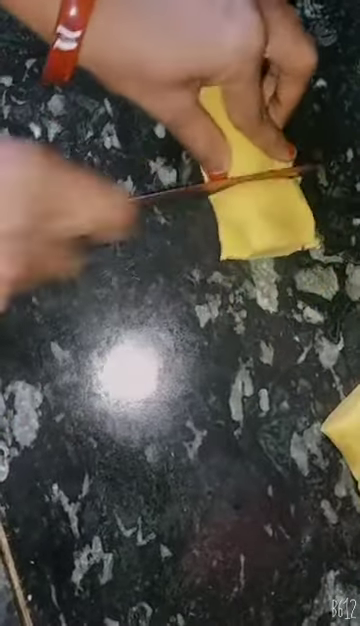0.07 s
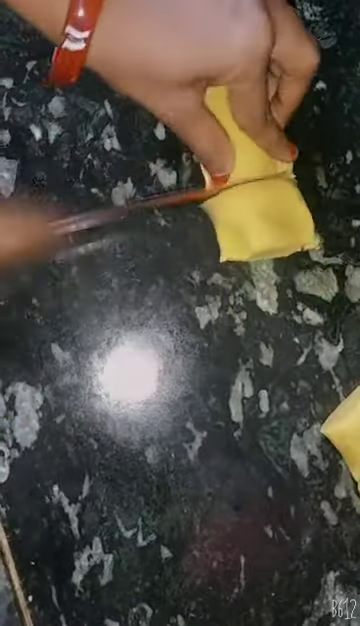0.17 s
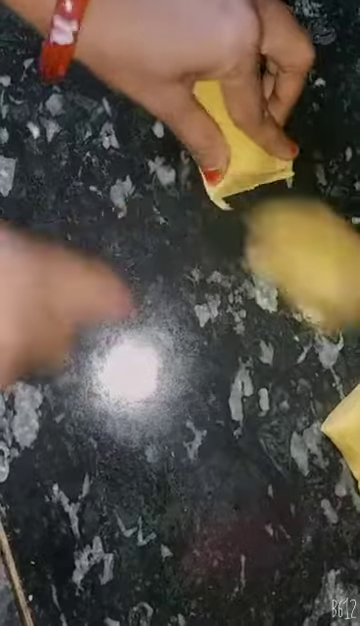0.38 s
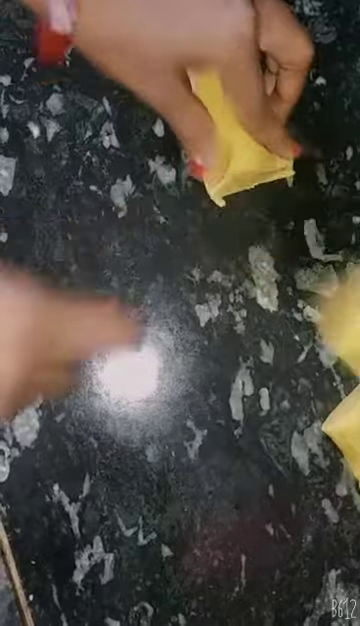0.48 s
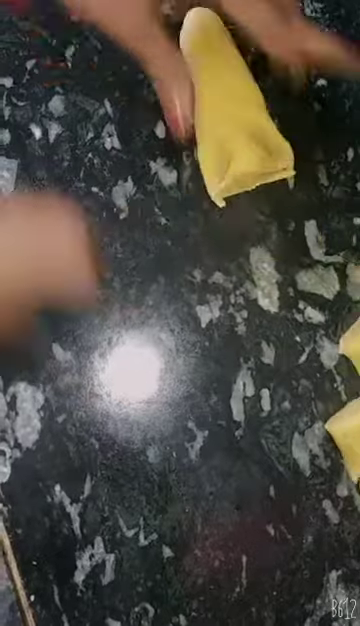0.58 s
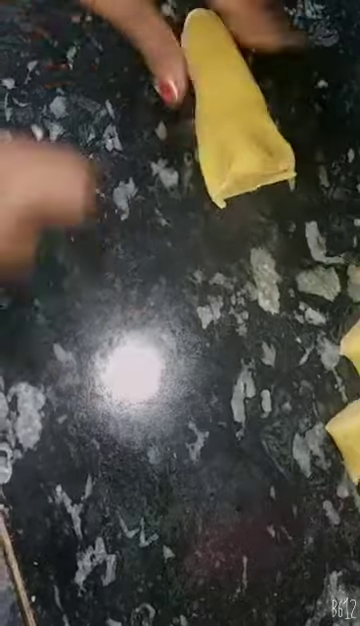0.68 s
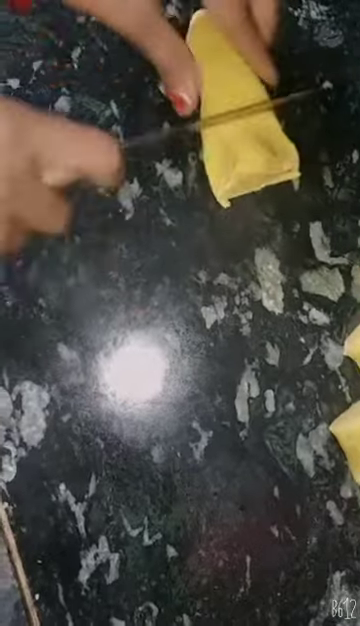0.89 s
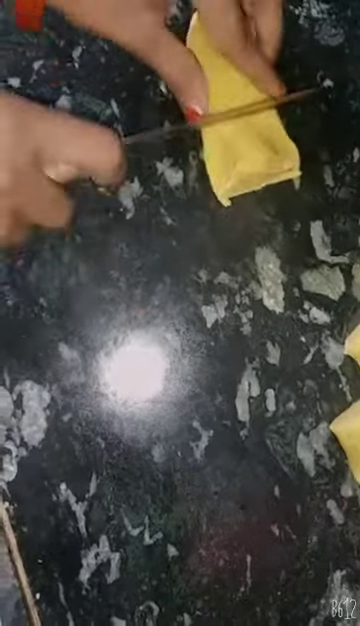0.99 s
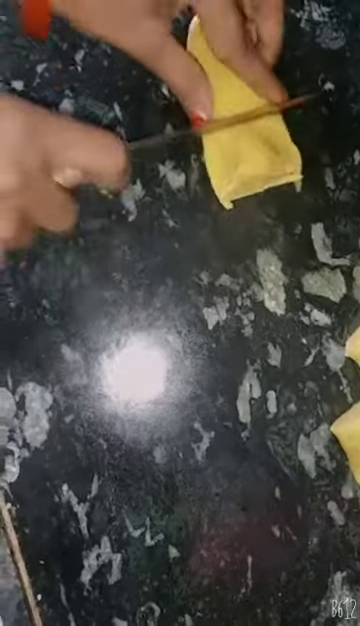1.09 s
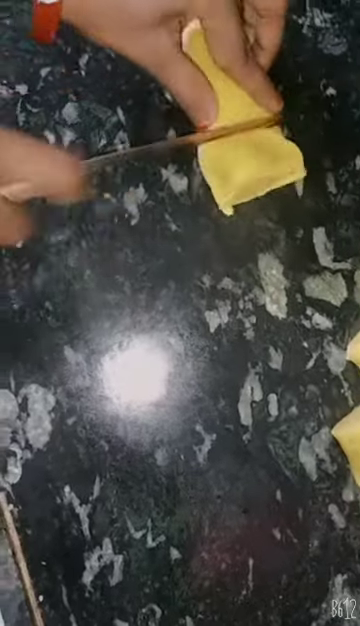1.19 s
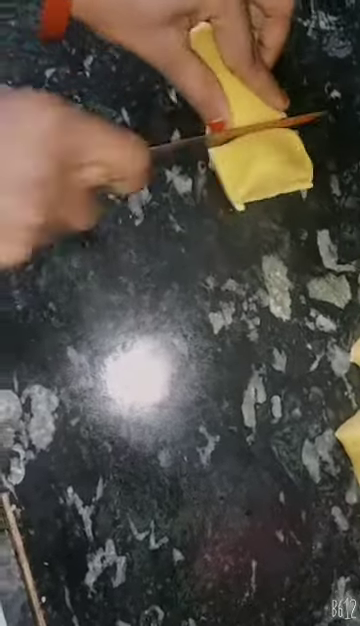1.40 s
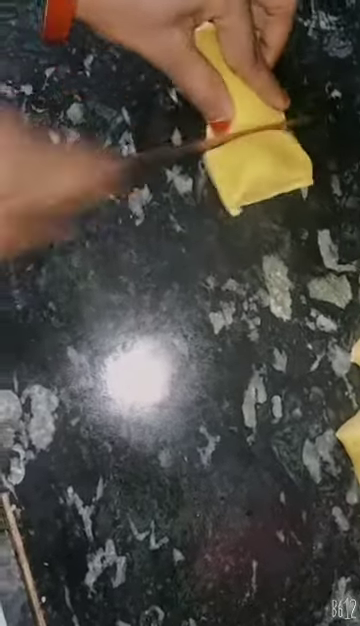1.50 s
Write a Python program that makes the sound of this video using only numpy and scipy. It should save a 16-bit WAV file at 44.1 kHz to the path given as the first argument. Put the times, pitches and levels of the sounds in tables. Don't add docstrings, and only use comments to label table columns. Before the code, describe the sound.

Close up, a knife cutting stiff dough gives sharp ticks and one brief metallic skid on stone, then near quiet over a low hum, a crisp second click and light sawing, with a short bright room tail.

```python
import sys
import numpy as np
from scipy import signal
from scipy.fft import rfft, irfft
from scipy.io import wavfile
from scipy.ndimage import map_coordinates

SR = 44100
rng = np.random.default_rng(int(sys.argv[2]) if len(sys.argv) > 2 else 0)


def dump_mix(stems):
    frames = np.atleast_2d(stems).T
    limited = np.clip(frames, -1, 1)
    pcm = np.round(limited * 32767).astype(np.int16)
    wavfile.write(sys.argv[1], SR, pcm)


def invert_db(x):
    u = np.asarray(x, float) / 20
    return 10 ** u


N = 66150
T = np.arange(N) / SR

# f/Hz, level/dB
HUM_COLOUR = [(60, -44), (110, -25.5), (200, -7), (300, -9), (800, -9.5), (2600, -23.5), (7000, -25.5),
              (12000, -22.5)]
# f/Hz, width/Hz, level/dB
HUM_HUMPS = [(330, 120, 0.5), (795.5, 120, -6)]
HUM_DB, HUMPS_DB = -62, -6.5

# start t/s, hardest t/s, lift
# t/s, level/dB, brightness f/Hz
SAWING = [(-.03, 0.004, 0.038, -46, 9240), (-.02, 0.011, 0.02, -55, 4080), (0.101, 0.13, 0.48, -57, 10700),
          (.96, 1.006, 1.075, -67, 9950), (1.108, 1.154, 1.3, -61, 10900), (1.177, 1.189, 1.148, -40, 8700),
          (1.192, 1.233, 1.35, -55.5, 8700), (1.269, 1.289, 1.287, -36.5, 8700),
          (1.32, 1.336, 0.87, -66, 8700), (1.401, 1.456, 1.63, -53, 11400),
          (1.422, 1.484, 1.53, -48.5, 8150)]
RISE_DB, FADE_DB = 15, 9
STROKE_Q, STROKE_BODY_DB = 2.1, -11
GRIT_PER_S, GRIT_SCATTER_DB = 16000, 1.3
CHATTER_PER_S, CHATTER_DB = 280, 2.4

# t/s, level/dB, ring time/s
EDGE_TICKS = [(.0098, -38, .002), (.0188, -33, .004), (.1878, -23, .003), (.2028, -20, .004),
              (.2085, -16, .005), (1.1810, -33, .003), (1.1827, -9, .0035), (1.1853, -20, .004),
              (1.1965, -26, .004), (1.467, -36, .003), (1.447, -40, .003), (1.458, -39, .002),
              (1.482, -40, .003)]
# f/Hz, level/dB
TICK_TONES = [(2100, -23), (3500, -14), (4700, -21), (5900, -19), (7800, -2), (9300, -8), (11100, -1),
              (12500, -10), (13600, -13)]
# f/Hz, level/dB
STEEL_ON_STONE = [(600, -18.5), (1500, -29.5), (2400, -26), (3800, -21.5), (5200, -15), (6800, -15),
                  (11000, -8), (14000, -9)]
TICK_CRACK_DB = -4

# t/s, level/dB
SKID_PRESSURE = [
    (.165, -52),
    (.186, -41),
    (.189, -33),
    (.198, -34),
    (.204, -25),
    (.222, -22),
    (.231, -23),
    (.2455, -20),
    (.249, -45),
]
# f/Hz, width/Hz, level/dB
BLADE_TONES = [(3820, 190, -20.5), (4900, 130, -22), (8000, 328.7, -13), (8700, 130, -18),
               (9630, 200, -10.5), (10800, 250, -3.5), (12040, 140, -5.5), (11900, 250, -24),
               (13000, 750, -14)]
BLADE_DB = -1.5

# t/s, f/Hz, level/dB, time to fall 60 dB/s
COUNTER_KNOCKS = [
    (.2375, 1300, -43, .012),
    (.2375, 550, -50, .02),
    (.205, 620, -56, .05),
    (.247, 2110, -45, .07),
    (.757, 270, -49, .07),
    (.2, 130, -66, .2),
    (1.183, 60, -69, .08),
]

# f/Hz, start t/s, end t/s, level/dB
SQUEAL_TONES = [
    (11630, .214, .230, -26),
    (8000, .217, .222, -24),
    (10560, .2345, .2478, -14.5),
    (9590, .236, .247, -25),
    (5000, .239, .244, -30),
]
SQUEAL_RAMP_S = .003

# f/Hz, time to fall 60 dB/s
ROOM_DECAY = [(1000, .42), (4500, .4), (8000, .32), (10500, .29), (13000, .21)]
ROOM_DB, ROOM_GAP_S = -2.5, 0.001446
TICK_ROOM_DB, SQUEAL_ROOM_DB, KNOCK_ROOM_DB = -5, -12, -8

THIN_HZ, BODY_DB = 1335, -16
NOTCH_HZ, NOTCH_WIDTH_HZ, NOTCH_SHARE = 2650, 450, .97
TOP_HZ = 13950


def unit(x):
    return x / np.sqrt(np.mean(x ** 2))


def band(x, hz, width):
    return signal.lfilter(*signal.iirpeak(min(hz, .45 * SR), hz / width, SR), x)


def colour(x, table):
    f = np.arange(N // 2 + 1) * SR / N + 1
    hz, db = np.array(table).T
    return irfft(rfft(x) * invert_db(np.interp(np.log(f), np.log(hz), db)), N)


def walk(rate):
    return unit(map_coordinates(rng.standard_normal(N), [T * rate], order=3))


def ring(s, hz, t60):
    u = np.maximum(T - s, 0)
    decay = np.exp(-np.log(1000) * u / t60)
    swell = 1 - np.exp(-u * hz * 0.98)
    return np.sin(2 * np.pi * hz * u) * decay * swell


def kitchen():
    hum = unit(colour(rng.standard_normal(N), HUM_COLOUR))
    humps = 0
    for hz, width, db in HUM_HUMPS:
        level = invert_db(db + 0.7 * walk(14) + 1.53 * walk(4.3))
        hump = band(band(rng.standard_normal(N), hz, width), hz, width)
        humps = humps + level * unit(hump)
    return invert_db(HUM_DB) * unit(hum + invert_db(HUMPS_DB) * humps)


def grit():
    hit = rng.random(N) < GRIT_PER_S / SR
    sign = rng.standard_normal(N)
    size_db = GRIT_SCATTER_DB * rng.exponential(size=N)
    return unit(hit * sign * invert_db(size_db + CHATTER_DB * walk(CHATTER_PER_S)))


def strokes():
    out = 0
    for start, top, lift, db, hz in SAWING:
        g = grit()
        bright = unit(band(band(g, hz, hz / STROKE_Q), hz, hz / STROKE_Q))
        body = unit(band(g, 3760, 3000))
        end = lift + .006
        push = np.interp(T, [start, top, lift, end], [db - RISE_DB, db, db - FADE_DB, db - 33.5])
        out = out + (bright + invert_db(STROKE_BODY_DB) * body) * invert_db(push) * (T > start) * (T < end)
    return out


def ticks():
    detune = 1 + .03 * rng.standard_normal((len(EDGE_TICKS), len(TICK_TONES)))
    noise = unit(colour(rng.standard_normal(N), STEEL_ON_STONE))
    out = 0
    for (s, db, t60), row in zip(EDGE_TICKS, detune):
        rings = sum(invert_db(g - 5) * ring(s, hz * d, t60) for (hz, g), d in zip(TICK_TONES, row))
        crack = noise * (T > s) * invert_db(-60 * np.maximum(T - s, 0) / (2 * t60))
        out = out + invert_db(db) * (rings + invert_db(TICK_CRACK_DB) * crack)
    return out


def blade(x):
    return sum(invert_db(db) * band(x, hz, width) for hz, width, db in BLADE_TONES)


def skid():
    g = grit()
    s, db = np.array(SKID_PRESSURE).T
    push = invert_db(np.interp(T, s, db)) * (T > s[0]) * (T < s[-1])
    edge_gain = 1 / np.std(colour(g, STEEL_ON_STONE))
    blade_gain = invert_db(BLADE_DB) / np.std(blade(g))
    return edge_gain * colour(g * push, STEEL_ON_STONE) + blade_gain * blade(g * push)


def counter_knocks():
    return sum(invert_db(db) * ring(s, hz, t60) for s, hz, db, t60 in COUNTER_KNOCKS)


def squeal():
    out = 0
    for hz, start, end, db in SQUEAL_TONES:
        gate = np.clip(np.minimum(T - start, 3 * (end - T)) / SQUEAL_RAMP_S, 0, 1)
        cycles = hz * np.cumsum(1 + .002 * walk(200)) / SR
        out = out + invert_db(db + 1.2 * walk(300)) * gate * np.sin(2 * np.pi * cycles)
    return out


def thin(x):
    high = signal.sosfilt(signal.butter(3, THIN_HZ, "high", fs=SR, output="sos"), x)
    x = high + invert_db(BODY_DB) * band(x, 500, 688.6)
    return x - NOTCH_SHARE * band(x, NOTCH_HZ, NOTCH_WIDTH_HZ)


def room(x):
    hz, t60 = np.array(ROOM_DECAY).T
    tail = 0
    for f in 500 * 2 ** np.arange(0, 5, .25):
        shape = [(f / 1.5, -70), (f / 1.09, 0), (f * 1.09, 0), (f * 1.5, -70)]
        hiss = colour(rng.standard_normal(N), shape)
        tail = tail + hiss * invert_db(-60 * T / np.interp(np.log(f), np.log(hz), t60))
    tail = tail * np.clip(T / ROOM_GAP_S - 1, 0, 1)
    return invert_db(ROOM_DB) * signal.fftconvolve(x, tail / np.sqrt(np.sum(tail ** 2)))[:N]


def scene():
    rub, tick = thin(skid() + strokes()), thin(ticks())
    tone, knocks = squeal(), counter_knocks()
    sent = rub + invert_db(TICK_ROOM_DB) * tick + invert_db(SQUEAL_ROOM_DB) * tone + invert_db(KNOCK_ROOM_DB) * knocks
    return (rub + tick + tone + knocks + room(sent) + kitchen())[None]


def low_pass(x):
    return signal.sosfilt(signal.butter(12, 14290, fs=SR, output="sos"), x)


def record(dry):
    mix = signal.sosfilt(signal.ellip(10, .2, 60, TOP_HZ, fs=SR, output="sos"), dry)
    return low_pass(mix)


dry = scene()
out = record(dry)
dump_mix(out)
```